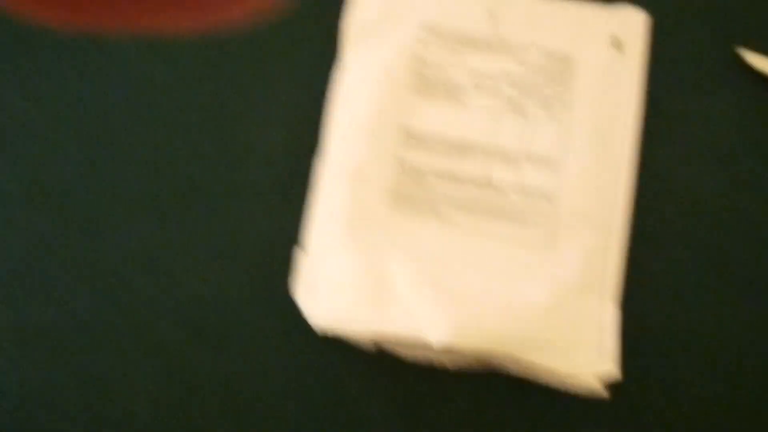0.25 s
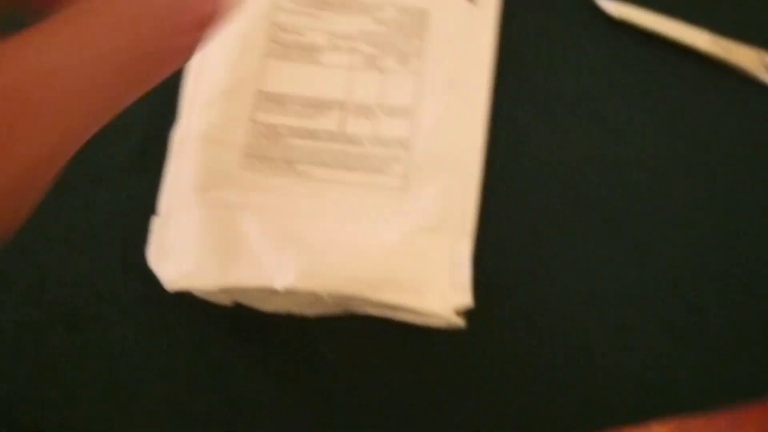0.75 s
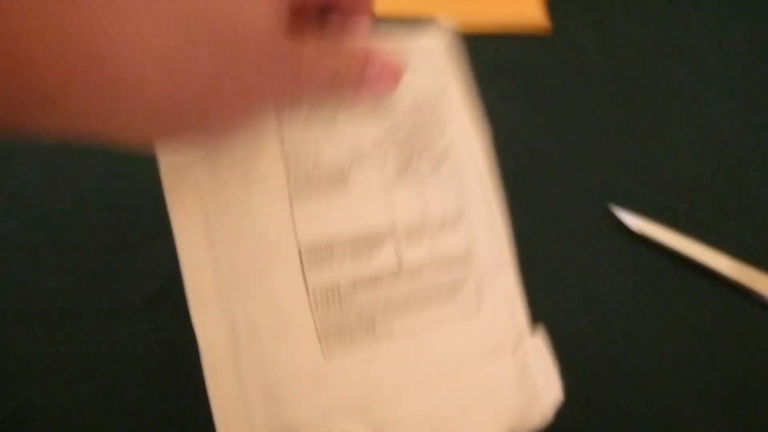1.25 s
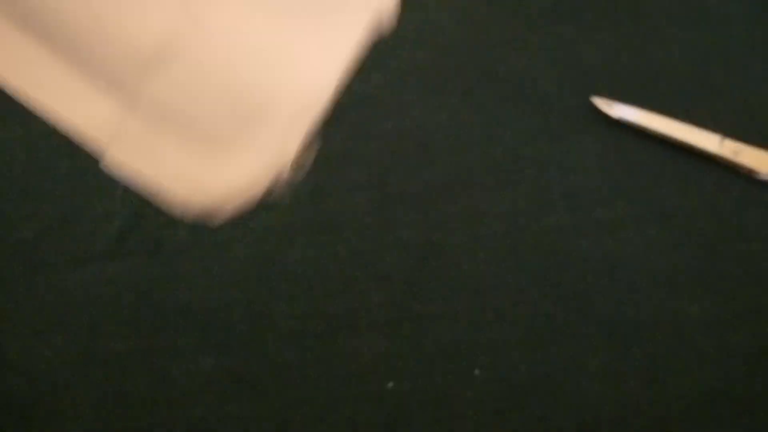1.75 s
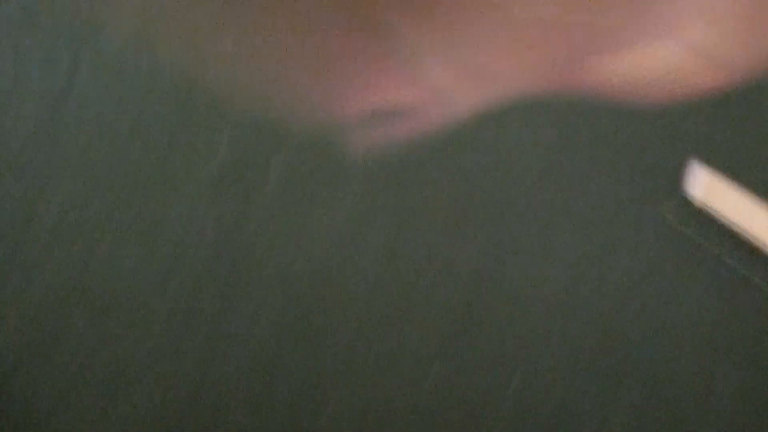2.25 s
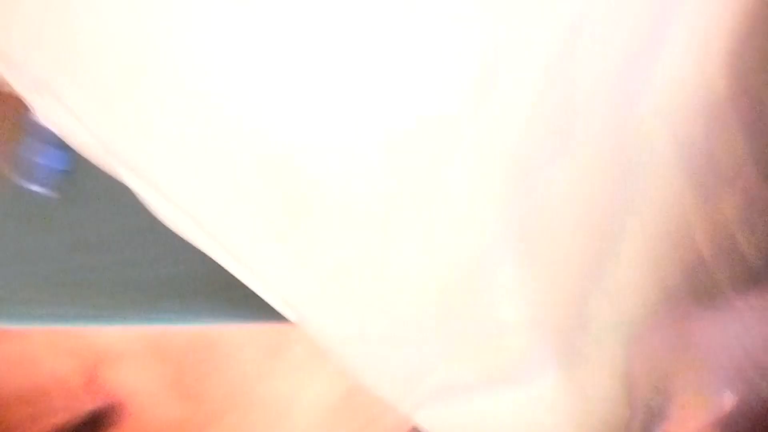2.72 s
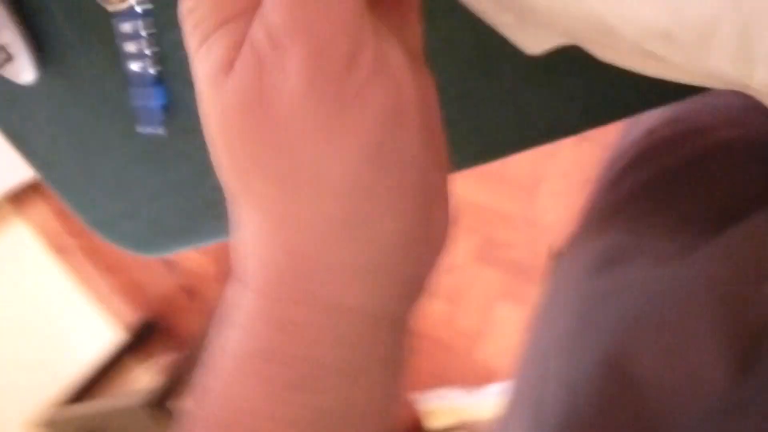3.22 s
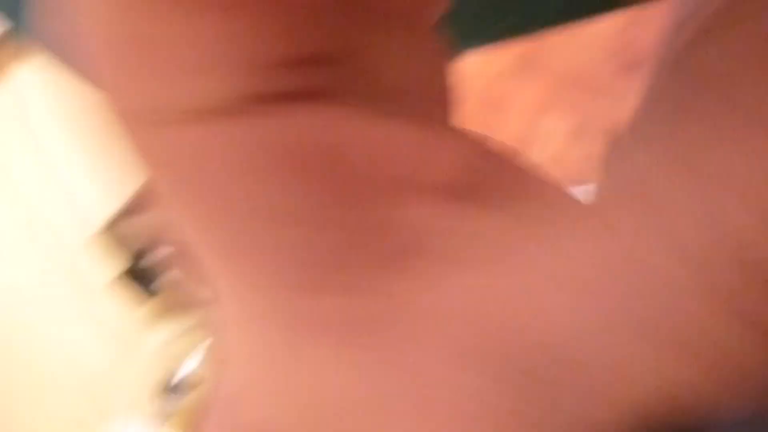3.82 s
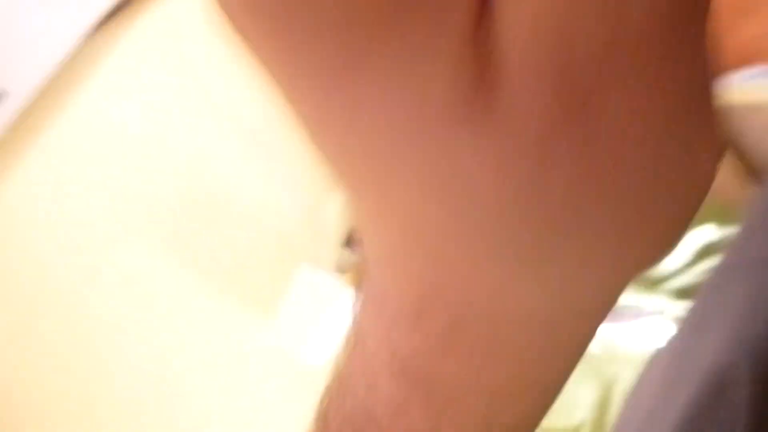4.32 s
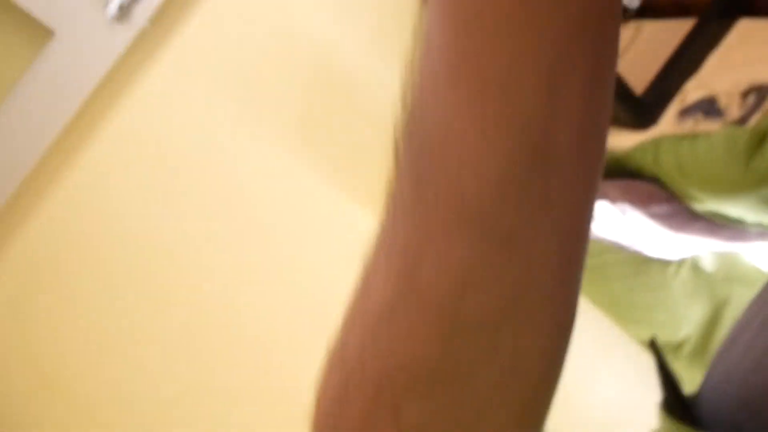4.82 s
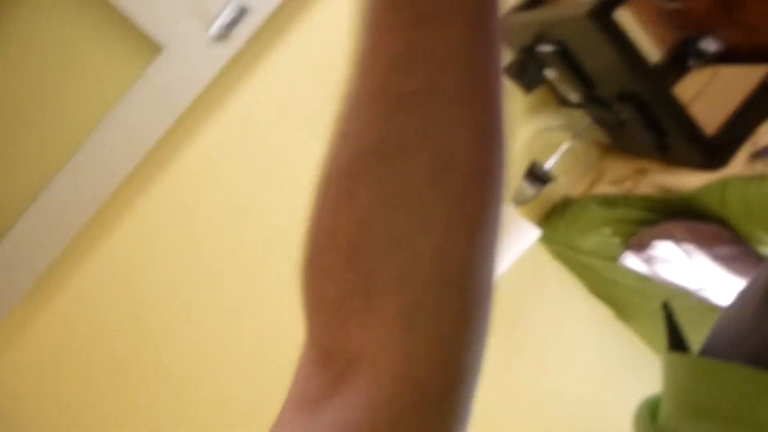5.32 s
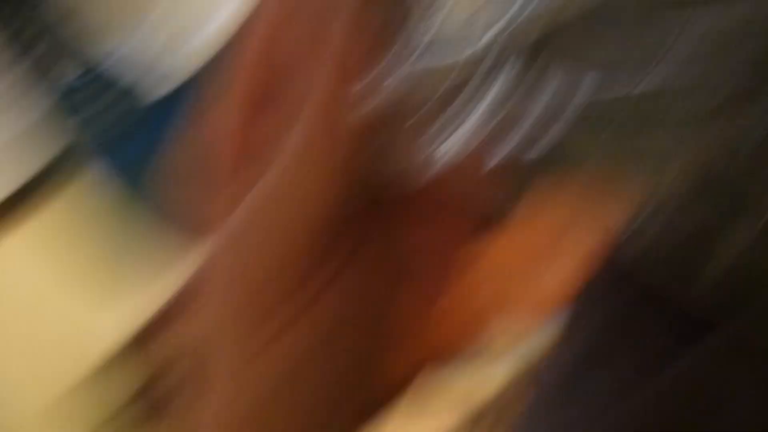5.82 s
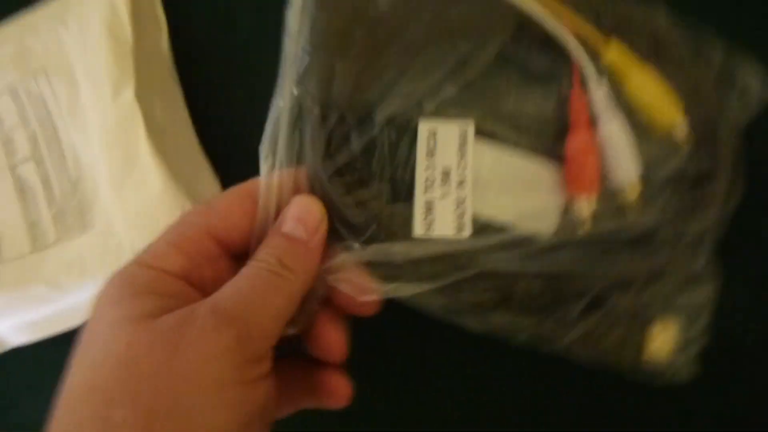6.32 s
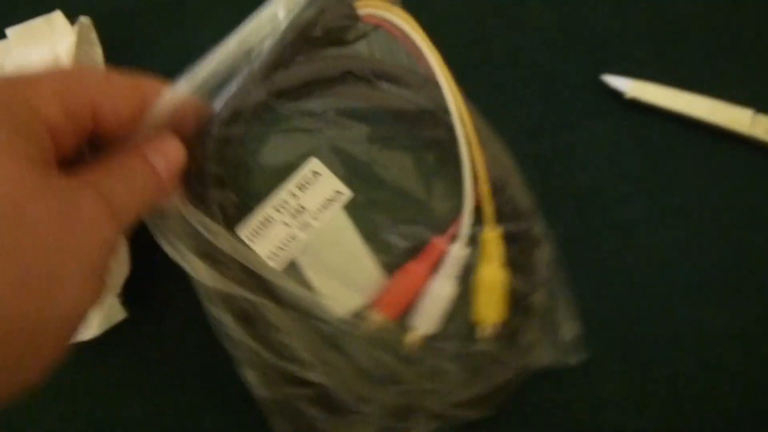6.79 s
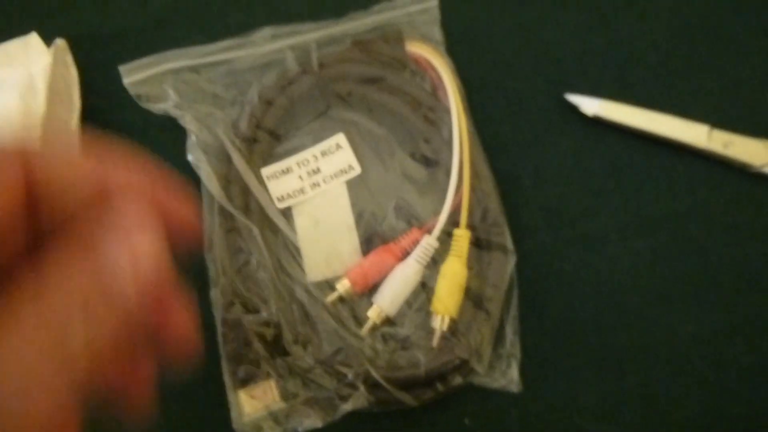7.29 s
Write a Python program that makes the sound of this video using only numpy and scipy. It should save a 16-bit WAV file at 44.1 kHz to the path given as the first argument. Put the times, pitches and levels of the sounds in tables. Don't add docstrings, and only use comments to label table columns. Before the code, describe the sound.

Very close to a small camera microphone in a quiet room, a stiff paper packet is brushed and lifted, then bursts into loud crackling. Hands open, rip and crumple it in uneven bursts, sharp snaps overloading at the peaks over dense tiny crackles and dull table knocks. Finally a plastic bag crinkles more lightly and is set down with a soft thud.

```python
import sys
import numpy as np
from scipy import signal
from scipy.fft import rfft, irfft, next_fast_len
from scipy.io import wavfile
from scipy.ndimage import uniform_filter1d

SR = 44100
rng = np.random.default_rng(int(sys.argv[2]) if len(sys.argv) > 2 else 0)


def linear_from_db(decibels):
    return 10 ** (np.asarray(decibels, float) / 20)


def unload_wav(signal):
    wavfile.write(
        sys.argv[1],
        SR,
        np.round(np.clip(np.atleast_2d(signal).T, -1, 1) * 32767).astype(np.int16),
    )


N = 332955

# (time [s], peak level [dB], panel pitch [Hz], crack above 5 kHz against the panel [dB])
LIFT_SNAPS = [(0.293, -21, 560, -15), (0.567, -24, 5360, 6.5), (1.095, -16, 2860, -20.5),
              (1.166, -8.5, 2630, -10), (1.277, -8, 1180, -25), (1.332, -9.5, 1310, -22),
              (1.347, -5.5, 1640, -9.5), (1.41, -7.5, 1770, -8.5), (1.439, -6, 1550, -23.5),
              (1.465, -18, 1290, -18), (1.553, 1.5, 1310, -11), (1.558, -12, 3080, -10),
              (1.619, -9, 2910, -1.5), (1.646, -7.5, 1160, -14), (1.675, -7, 1140, -6),
              (1.683, -2, 1770, -3.5), (1.693, -7.5, 950, -3), (1.76, -8.5, 1340, 0),
              (1.806, -20.5, 5300, -13), (1.973, -14.5, 1250, -24), (2.078, -33.5, 2110, -18)]
OPEN_SNAPS = [(2.3, -8.5, 3920, -3.5), (2.348, -13, 1530, -5), (2.458, -20, 620, -3),
              (2.612, -19.5, 4010, -7), (2.696, -29, 8350, 5.5), (2.814, -25.5, 3100, 1),
              (3.095, -15, 2520, 3), (3.195, -11, 4820, 5.5), (3.266, -5, 4610, -7.5),
              (3.27, -1.5, 2000, -5), (3.31, -7, 1230, -4), (3.501, -8, 4010, -1.5),
              (3.525, -11.5, 5150, -7.5), (3.602, -21.5, 2930, -15), (3.659, -15.5, 1120, -23),
              (3.683, -11.5, 2500, -22), (3.854, -11.5, 1180, -12), (3.895, -13.5, 3940, -7),
              (3.922, -10, 1400, -15), (3.955, -10.5, 2520, -10), (4.024, -20.5, 1640, -4)]
RIP_SNAPS = [(4.11, -6.5, 3120, -10), (4.113, -6.5, 1680, -11.5), (4.238, -6.5, 580, -18),
             (4.246, -8.5, 7240, -4), (4.255, -7.5, 3980, 2), (4.335, -9, 820, -9), (4.393, -7.5, 860, -22),
             (4.4, -7.5, 1550, -15), (4.457, -6, 900, 7.5), (4.498, 1, 4070, -3.5), (4.591, -20, 2300, -26),
             (4.672, -13.5, 1400, -2.5), (4.822, -8, 4110, 2), (5.028, -23.5, 2540, -11.5),
             (5.08, -3, 1770, -22), (5.082, 0, 3980, -23), (5.085, -4, 4820, -14), (5.136, -3.5, 1660, -12),
             (5.193, -9, 1870, -8.5), (5.206, -7, 1680, -22), (5.386, -15.5, 8100, 8.5),
             (5.398, -13, 5340, 0)]
BAG_SNAPS = [(5.531, -17.5, 1980, 2), (5.611, -13, 1380, -49), (5.698, -26, 3940, -16),
             (5.919, -10, 1590, -6), (5.904, -13.5, 5020, 8), (5.99, -15.5, 4870, 0.5),
             (6.019, -14, 6240, -1), (6.024, -19, 620, 3), (6.162, -22.5, 990, 6.5),
             (6.345, -17.5, 6630, 1), (6.383, -8.5, 1160, -9), (6.43, -17.5, 2970, 1.5),
             (6.745, -23, 2070, -21.5), (6.909, -23, 2260, -8), (6.952, -19, 5040, -7),
             (7.092, -12, 990, -6), (7.096, -13, 530, -15)]
# (time [s], peak level [dB])
TICKS = [(1.321, -17), (2.659, -31), (3.153, -19), (3.405, -16.5), (3.484, -20), (4.512, -11), (4.708, -18),
         (4.737, -15), (4.751, -21), (5.814, -11.5), (5.945, -19), (5.974, -23), (6.047, -21), (6.25, -23),
         (6.474, -19), (6.517, -24), (6.558, -21), (6.564, -22), (6.598, -18.5), (6.804, -22.5),
         (6.988, -18), (7.015, -24), (7.153, -29)]
TICK_HZ, TICK_CRACK_DB = 4700, 1.5
ALIKE_SNAPS = [(s, db, TICK_HZ, TICK_CRACK_DB) for s, db in TICKS]
SNAPS = LIFT_SNAPS + OPEN_SNAPS + RIP_SNAPS + BAG_SNAPS + ALIKE_SNAPS
# (time [s], peak level [dB], panel
# pitch [Hz])
LIFT_FOLDS = [(0.217, -29, 5470), (0.293, -22, 670), (0.533, -34, 1080), (1.066, -19, 2540),
              (1.096, -18, 2050), (1.135, -17, 2090), (1.167, -10, 2500), (1.35, -11, 1210),
              (1.382, -19, 4180), (1.41, -8, 1770), (1.425, -18, 1720), (1.439, -9, 2610),
              (1.456, -23, 3620), (1.559, -12, 1160), (1.637, -8, 990), (1.65, -13, 4800),
              (1.674, -6, 4110), (1.691, -2, 2780), (1.761, -9, 4760), (1.764, -14, 860),
              (1.806, -23, 1160), (1.818, -20, 1360), (1.848, -26, 1870), (1.891, -20, 800),
              (1.991, -24, 820), (2.043, -36, 5730), (2.348, -12, 2520), (2.457, -14, 4950),
              (2.535, -26, 3750), (2.568, -23, 2520), (2.629, -32, 2390), (2.658, -40, 1940)]
OPEN_FOLDS = [(2.803, -33, 1310), (2.815, -34, 1400), (2.841, -30, 4030), (2.861, -23, 1270),
              (2.897, -32, 9260), (2.945, -26, 2520), (3.054, -26, 2540), (3.073, -17, 4630),
              (3.172, -29, 1250), (3.18, -22, 7240), (3.195, -17, 930), (3.2, -6, 3940), (3.212, -19, 950),
              (3.31, -2, 4570), (3.332, -20, 6050), (3.376, -18, 8510), (3.471, -21, 3320),
              (3.486, -26, 1870), (3.498, -12, 4870), (3.503, -17, 1400), (3.635, -22, 5510),
              (3.639, -18, 1180), (3.666, -18, 670), (3.68, -21, 1440), (3.69, -15, 2610),
              (3.696, -15, 2650), (3.703, -22, 730), (3.736, -28, 4030), (3.739, -27, 1160),
              (3.743, -28, 1120), (3.784, -28, 3920), (3.791, -31, 7750), (3.809, -27, 670),
              (3.823, -19, 5990), (3.854, -11, 4130), (3.894, -19, 2480), (3.979, -26, 4010),
              (3.998, -24, 4010), (4.012, -25, 2930), (4.033, -23, 3900), (4.067, -26, 3750),
              (4.092, -26, 860)]
RIP_FOLDS = [(4.113, -8, 3290), (4.125, -12, 5790), (4.147, -10, 6850), (4.161, -9, 6460),
             (4.177, -11, 3880), (4.189, -10, 3640), (4.255, -10, 1770), (4.262, -12, 3470),
             (4.292, -15, 2800), (4.295, -15, 5490), (4.309, -19, 4030), (4.341, -13, 4050),
             (4.359, -15, 1810), (4.368, -13, 2650), (4.386, -12, 6010), (4.397, -7, 5640),
             (4.418, -14, 5530), (4.499, -9, 1640), (4.591, -22, 2520), (4.66, -25, 5100),
             (4.69, -22, 5080), (4.694, -21, 5170), (4.726, -21, 3940), (4.9, -29, 1180),
             (4.918, -29, 3920), (4.944, -32, 1660), (4.953, -34, 3270), (5.005, -32, 1660),
             (5.048, -25, 1100), (5.086, -8, 1660), (5.136, -5, 5060), (5.361, -11, 5210),
             (5.467, -31, 3600), (5.526, -21, 1140), (5.531, -15, 3140), (5.792, -27, 710),
             (5.799, -10, 6220), (5.842, -10, 4930), (5.847, -12, 5710), (5.879, -11, 5040)]
BAG_FOLDS = [(5.918, -9, 4160), (5.939, -21, 2800), (5.95, -19, 5560), (5.975, -33, 2500),
             (6.024, -13, 3960), (6.054, -26, 4070), (6.113, -26, 4090), (6.203, -26, 4130),
             (6.208, -26, 6800), (6.246, -30, 5020), (6.259, -30, 3920), (6.313, -29, 4740),
             (6.318, -31, 1060), (6.329, -28, 5000), (6.353, -23, 4090), (6.377, -17, 5120),
             (6.381, -16, 2690), (6.413, -21, 4630), (6.514, -28, 4310), (6.559, -32, 1510),
             (6.584, -16, 2520), (6.604, -24, 6370), (6.624, -22, 2560), (6.659, -27, 3920),
             (6.668, -34, 990), (6.681, -36, 1100), (6.75, -27, 5510), (6.77, -32, 5660),
             (6.804, -29, 1720), (6.849, -35, 1310), (6.936, -32, 7340), (6.953, -25, 1490),
             (6.99, -23, 1360), (7.015, -16, 4010), (7.022, -25, 4110), (7.047, -25, 5900),
             (7.072, -19, 4220), (7.095, -14, 2540), (7.151, -29, 6160), (7.215, -37, 2520)]
# (time [s], peak level [dB], pitch [Hz], time for the shaken sheet to lose 20 dB [s])
KNOCKS = [(0.289, -27, 189, .015), (0.528, -36, 300, .04), (0.563, -34, 260, .015),
          (1.0625, -17.5, 159, .25), (1.172, -20, 182, .17), (1.68, -25.5, 398, .08),
          (1.965, -32, 191, .05), (2.297, -26.5, 183, .05), (2.454, -15, 330, .012),
          (2.563, -30.5, 108, .012), (4.225, -12, 343, .05), (4.492, -23.5, 170.5, .012),
          (4.817, -27, 188, .12), (6.017, -25, 351, .035), (6.375, -13.5, 187.5, .075),
          (7.09, -15, 270, .11)]
# (time [s], level [dB])
SLIDE = [
    (.155, -72),
    (.168, -40),
    (.205, -42),
    (.218, -53),
]
# (pitch [Hz], width [Hz], level [dB])
SLIDE_TONES = [(8250, 1900, 4.5), (10700, 1500, 1.5), (5000, 2200, -6)]
# (time [s], peak level [dB], pitch [Hz], time to lose 20 dB [cycles], swell [cycles])
RINGS = [
    (.317, -18, 4600, 4, 0.65),
    (0.319, -17.5, 7950, 6, 0.45),
    (.322, -29.5, 1273, 55, 16),
    (.32, -42, 2120, 60, 20),
    (7.12, -53, 205, 90, 6),
    (2.13, -66, 2700, 900, 350),
]
# (start [s], end [s], first pitch [Hz], last pitch [Hz], width [Hz], level [dB])
SCRAPES = [
    (2.935, 3.108, 2050, 2450, 650, -41),
    (6.19, 6.5, 760, 1500, 310, -49.5),
    (2.495, 2.565, 720, 200, 120, -46),
]
# (lowest pitch [Hz], highest pitch [Hz], ring [cycles], rate [per s],
# size spread [dB], share led by crumple rather than fizz [0-1], level [dB])
GRAINS = [
    (646, 1800, 1.72, 700, 4.5, 1, -5),
    (1830, 3820, 1.4, 1300, 3, 0.65, -3.5),
    (4000, 7670, 1.6, 2200, 3.5, 0.12, -1.5),
    (7870, 13800, 2.2, 3500, 4, 0, -4.5),
]
# (peak time [s], effort [dB], brightness [dB], time to swell 20 dB [s], time to fade 20 dB [s])
LIFT_GRIPS = [(0.0, -57, -4, .01, .3), (.33, -41.5, -8, .14, .2), (.41, -52, 1.5, .15, .08),
              (.555, -46, -4, .1, .045), (.8, -63, -7, 1.5, 1.5), (1.07, -27.5, -4, .012, .07),
              (1.165, -26, -7, .18, .13), (1.28, -23.5, -8, .03, .045), (1.342, -22.5, -10, .055, .06),
              (1.41, -32.5, -6, .3, .17), (1.558, -31, -4, .07, .2), (1.639, -21.5, -5, .17, .05),
              (1.684, -20.5, -3.5, .04, .07), (1.77, -32, -7, .12, .2), (1.98, -36.5, -10, .45, .1)]
OPEN_GRIPS = [(2.308, -28, 0, .017, .14), (2.4, -32.5, 8, .2, .12), (2.462, -33, -3, .1, .06),
              (2.545, -43, 0, .6, .065), (2.85, -46.5, -3, .22, .2), (2.996, -37.5, -4, .16, .45),
              (3.148, -32.5, -5, .45, .055), (3.205, -28.5, -3, .035, .2), (3.27, -34, 2.5, .2, .3),
              (3.375, -37.5, 0, .45, .45), (3.533, -27.5, -2.5, .11, .085), (3.638, -26, -11, .008, .14),
              (3.7, -37, -6, .1, .2), (3.832, -29, -2.5, .015, .22)]
RIP_GRIPS = [(4.112, -29, -5, .07, .3), (4.225, -24, -1.5, .4, .115), (4.396, -27.5, -1.5, .13, .12),
             (4.504, -34, 0, .45, .075), (4.58, -47, -2.5, .3, .25), (4.679, -35.5, -4, .035, .2),
             (4.74, -41, 1.5, .1, .07), (4.818, -28, 1.5, .05, .105), (5.012, -46, 0, .012, .4),
             (5.081, -25.5, -13, .03, .09), (5.2, -25, 1.5, .14, .65), (5.389, -34.5, 0, .45, .11),
             (5.528, -28.5, -19, .025, .085), (5.615, -37, -16, .025, .17), (5.811, -27.5, 3, .03, .2),
             (5.913, -25.5, -5, .1, .048)]
BAG_GRIPS = [(6.025, -41, -6, .12, .1), (6.13, -53, 11, .2, .2), (6.208, -46, -1.5, .18, .03),
             (6.255, -41, -6, .018, .055), (6.36, -44, -4, .25, .1), (6.384, -34.5, -2.5, .03, .13),
             (6.57, -47, 0, .8, .6), (6.995, -44, -2.5, .17, .3), (7.096, -32.5, -3.5, .15, .11)]
FIZZ_STEEPER = 1.1
FLAPS_DB = [
    -18,
    -10.5,
    -10.5,
    -17,
]
SHAKE_DB, SHAKE_RISE_S, SHAKE_LATE_S = -14.5, .012, .016
# (time [s], left over right [dB])
PLACE = [(0.0, -2.5), (2.42, 2.5), (3.39, -6.5), (6.37, -1.5), (6.69, -0.5), (7.55, 1.5)]
# (frequency [Hz], time to die by 60 dB [s])
ROOM = [(100, 0.24), (500, 0.28), (2000, 0.067), (8000, 0.09), (16000, 0.047)]
# (pitch [Hz], width [Hz], level [dB])
CASE = [(4070, 120, -8.5), (4840, 180, -8.5)]
# (frequency [Hz], side over mid [dB])
WIDEN = [(60, -18), (130, -12), (290, 6), (600, 1.5), (1200, -9.5), (4000, -15), (15000, -10)]
# (frequency [Hz], level per Hz [dB])
STILL = [(40, -10), (110, -5.5), (240, 6), (400, -2.5), (800, -2.5), (1600, -10.5), (4000, -17.5),
         (15000, -21)]
# (frequency [Hz], side over mid [dB])
STILL_SIDE = [(60, -15), (130, 0), (640, 8.5), (1410, 4), (3100, 3), (15000, -10)]
STILL_DB = -60.5


def evened(x):
    return x / np.sqrt(np.mean(x ** 2) + 1e-20)


def smooth(x, first, second):
    return uniform_filter1d(uniform_filter1d(x, first), second)


def read(points, hz):
    f, value = np.transpose(points)
    return np.interp(np.log(hz + 1), np.log(f + 1), value)


def curve(rows, column):
    s, value = np.transpose(rows)[[0, column]]
    return np.interp(np.arange(N) / SR, s, value, -120, -120)


def add(mix, s, sound):
    part = mix[:, round(s * SR):][:, :sound.shape[1]]
    part += sound[:, :part.shape[1]]


def place(s):
    pan_db = np.interp(s, *np.transpose(PLACE))
    return linear_from_db(np.array([pan_db / 2, -pan_db / 2]))


def resonate(x, hz, width):
    return signal.lfilter(*signal.iirpeak(hz, hz / width, SR), x)


def burst(t, peak_s):
    return t / peak_s * np.exp(1 - t / peak_s)


def ping(hz, cycles, phase, size, rise=0.61):
    u = np.arange(size) * hz / SR
    swell = np.sin(np.pi / 2 * np.minimum(u / rise, 1)) ** 2
    return np.sin(2 * np.pi * u + phase) * swell * linear_from_db(-20 * u / cycles)


def air():
    frames, hz = N // 256 + 5, np.fft.rfftfreq(512, 1 / SR)
    a, b, c, d, patches = rng.standard_normal((frames, 257, 5)).T
    patches = evened(uniform_filter1d(uniform_filter1d(patches, 5, 0), 12, 1))
    z = np.array([a + 1j * b, (c + 1j * d) * linear_from_db(read(STILL_SIDE, hz))[:, None]])
    colour = linear_from_db(read(STILL, hz)[:, None] + 0.76 * patches)
    mid, side = signal.istft(z * colour, nperseg=512, noverlap=256)[1][:, :N]
    return linear_from_db(STILL_DB) * np.array([mid + side, mid - side]) / np.std(mid)


def swells(rows, steeper=1):
    t = np.arange(0, N + 32, 32) / SR
    s, db, rise, fade = np.transpose(rows)[:, :, None]
    away = np.maximum((s - t) / rise, (t - s) / fade)
    alive = (t >= np.r_[[[-1]], s[:-1]]) & (t <= np.r_[s[1:], [[N]]])
    level = np.where(alive, db - 20 * steeper * away, -200).max(0)
    return np.interp(np.arange(N) / SR, t, level)


def hands():
    actions = (LIFT_GRIPS, OPEN_GRIPS, RIP_GRIPS, BAG_GRIPS)
    grips = [(*grip, flap) for action, flap in zip(actions, FLAPS_DB) for grip in action]
    crumple_db = swells([(s, db, rise, fade) for s, db, _, rise, fade, _ in grips])
    fizz_db = swells([(s, db + bright, rise, fade) for s, db, bright, rise, fade, _ in grips], FIZZ_STEEPER)
    sway_db = swells([(s, db + flap, rise, fade) for s, db, _, rise, fade, flap in grips])
    shake_db = swells([(s + SHAKE_LATE_S, db + SHAKE_DB, SHAKE_RISE_S, fade) for s, db, _, fade in KNOCKS])
    return np.maximum(sway_db, shake_db), crumple_db, fizz_db


def clicks(rate, spread_db):
    size = linear_from_db(spread_db * np.minimum(rng.exponential(1, N), 3.6))
    struck = rng.random(N) < rate / SR
    return evened(size * struck * rng.choice([-1., 1.], N))


def grains(low_hz, high_hz, cycles, rate, spread_db, clumps, ticks, hiss=0.38, apart=0.16, count=7):
    drive = clicks(rate * clumps, spread_db) + hiss * rng.standard_normal(N)
    wander = evened(np.log(clumps))
    which, family = rng.integers(0, count, N), np.zeros((2, N))
    for k, hz in enumerate(np.geomspace(low_hz, high_hz, 2 * count + 1)[1::2]):
        pole = linear_from_db(-20 * hz / SR / cycles) * np.exp(2j * np.pi * hz / SR)
        push = drive * (which == k) + ticks * rng.choice([-1, 1])
        ring = signal.lfilter([(1 - abs(pole)) ** 1.98], [1, -2 * pole, pole ** 2], push)
        drift = rng.standard_normal() + 1.5 * np.roll(wander, 9000 * (k + 1))
        turn = apart * (0.28 + hz / 9000) * drift
        family += np.cos(turn) * ring.imag + np.sin(turn) * ring.real * [[1], [-1]]
    return evened(family * clumps)


def rustle(clump_db=1.4):
    flap_db, crumple_db, fizz_db = hands()
    clumps = linear_from_db(clump_db * evened(smooth(rng.standard_normal(N), 330, 140)))
    busy = np.clip((crumple_db + 61.5) / 15, 0, 1)
    ticks = 0.1 * busy * clicks(200 * clumps, 2.8)
    out = linear_from_db(flap_db - 1.0) * grains(88, 430, 1.66, 500, 2.5, clumps ** .5, 0, count=5)
    for *family, share, db in GRAINS:
        level_db = db + share * crumple_db + (1 - share) * fizz_db
        out += linear_from_db(level_db) * grains(*family, clumps, ticks)
    return out * place(np.arange(N) / SR)


def slide():
    noise = rng.standard_normal(N)
    hiss = .11 * noise
    for hz, width, db in SLIDE_TONES:
        hiss = hiss + linear_from_db(db) * resonate(resonate(noise, hz, width), hz, width)
    return evened(hiss) * linear_from_db(curve(SLIDE, column=1)) * place([.2])


def folds(cycles=1.8, crack_s=0.00025, crack_db=-6, bright_db=5):
    rows = LIFT_FOLDS + OPEN_FOLDS + RIP_FOLDS + BAG_FOLDS
    out, t = np.zeros((2, N)), np.arange(300) / SR
    chance = rng.standard_normal((len(rows), 602))
    edge = signal.butter(2, [2200, 12500], "band", fs=SR)
    for (s, db, hz), row in zip(rows, chance):
        panel = ping(hz, cycles * (hz / 1500) ** 0.7, 3 * row[0], 300)
        a, c = row[2:].reshape(2, -1)
        tick = evened(signal.lfilter(*edge, [a + .4 * c, a - .4 * c])) * burst(t, crack_s)
        tick_db = crack_db + bright_db * np.log2(hz / 4000)
        sound = panel / abs(panel).max() + linear_from_db(tick_db) * tick
        gains = place(s) * linear_from_db(1.5 * row[1] * np.array([1, -1]))
        add(out, s - .0003 - .6 / hz, linear_from_db(db - 0.3) * gains[:, None] * sound / abs(sound).max())
    return out


def knocks():
    out, t = np.zeros((2, N)), np.arange(9000) / SR
    phases = rng.uniform(0, 2 * np.pi, len(KNOCKS))
    noise = rng.standard_normal((len(KNOCKS), len(t)))
    for (s, db, hz, fade), phase, shake in zip(KNOCKS, phases, noise):
        push = ping(1.15 * hz, 1.33, phase, len(t))
        grumble = evened(resonate(resonate(shake, hz, 0.57 * hz), hz, 0.45 * hz))
        grumble *= linear_from_db(-60 * t / min(0.19, 3 * fade)) * (1 - np.exp(-t / 0.0036))
        add(out, s + 0.00297, linear_from_db(db - 2.5) * np.ones((2, 1)) * (3.26 * push + 0.3 * grumble))
    return out


def snaps(cycles=2.46, crack_s=0.00044, crack_db=-7, wide_db=-10.5):
    out, t = np.zeros((2, N)), np.arange(500) / SR
    chance, noise = rng.random((len(SNAPS), 4)), rng.standard_normal((len(SNAPS), 3, 500))
    body = signal.butter(2, [700, 5500], "band", fs=SR)
    for (s, db, hz, rel_db), (phase, pan, length, top), (a, b, c) in zip(SNAPS, chance, noise):
        long = cycles * (0.88 + 0.68 * length) * (hz / 1500) ** 0.9
        panel = ping(hz, long, 2 * np.pi * phase, 500)
        panel = signal.lfilter(*signal.butter(2, .42 * hz, "high", fs=SR), panel)
        rattle = evened(signal.lfilter(*body, b)) * burst(t, 0.0007)
        treble = signal.butter(2, [5000, 9000 + 5000 * top], "band", fs=SR)
        crack = evened(signal.lfilter(*treble, [a + 0.45 * c, a - .6 * c])) * burst(t, crack_s)
        sound = panel / abs(panel).max() + linear_from_db(wide_db) * rattle + linear_from_db(rel_db + crack_db) * crack
        gains = place(s) * linear_from_db(2.2 * (pan - .5) * np.array([1, -1]))
        add(out, s - .0003 - .6 / hz, linear_from_db(db - 1.42) * gains[:, None] * sound)
    return out


def rings():
    out = np.zeros((2, N))
    for s, db, hz, cycles, rise in RINGS:
        add(out, s, linear_from_db(db + 2.5) * place(s)[:, None] * ping(hz, cycles, 0, 19000, rise))
    return out


def scrapes(lump_db=4):
    out = np.zeros((2, N))
    for t0, t1, hz0, hz1, width, db in SCRAPES:
        size = round((t1 - t0) * SR)
        turn = np.exp(2j * np.pi * np.cumsum(np.linspace(hz0, hz1, size)) / SR)
        rub = signal.lfilter(*signal.butter(2, width / 2, fs=SR), rng.standard_normal((2, size)))
        hollow = evened((turn * (rub[0] + 1j * rub[1])).real) * signal.windows.tukey(size, .5)
        hollow = hollow * linear_from_db(lump_db * evened(smooth(rng.standard_normal(size), 300, 300)))
        add(out, t0, linear_from_db(db) * place(t0)[:, None] * hollow)
    return out


def room(x, size=11000):
    taps = np.zeros((2, size))
    at = np.arange(120, size - 20, 20)
    at = at + rng.integers(0, 20, (2, len(at)))
    np.put_along_axis(taps, at, rng.choice([-1., 1.], at.shape), 1)
    hz, t, z = signal.stft(taps, SR, nperseg=128)
    tail = signal.istft(z * linear_from_db(-60 * t / read(ROOM, hz)[:, None]), SR, nperseg=128)[1]
    return signal.oaconvolve(x.mean(0)[None], tail / np.linalg.norm(tail[0]), axes=1)[:, :N]


def ports(x, wet):
    size = next_fast_len(N)
    gain = linear_from_db(read(WIDEN, np.fft.rfftfreq(size, 1 / SR)))
    turned_mid = 1j * rfft(x.mean(0), size)
    room_side = rfft(wet[0] - wet[1], size)
    side = irfft(gain * (turned_mid + 0.73 * room_side), size)[:N]
    return x + wet + np.array([side, -side])


def scene():
    near = rustle() + slide() + folds() + knocks() + snaps() + rings() + scrapes()
    near = signal.lfilter(*signal.butter(2, 105, "high", fs=SR), near)
    wet = linear_from_db(-19) * room(near)
    return ports(near, wet) + air()


def roll_off(x):
    return signal.sosfilt(signal.butter(12, 16520, fs=SR, output="sos"), x)


def record(dry):
    x = dry + sum(linear_from_db(db) * resonate(dry, hz, width) for hz, width, db in CASE)
    x = signal.lfilter(*signal.butter(1, 45, "high", fs=SR), x)
    overloaded = np.clip(x, -1, 1)
    band_limit = signal.firwin(511, 15750, window=("kaiser", 8), fs=SR)
    mix = signal.oaconvolve(overloaded, band_limit[None], "same")
    return roll_off(mix)


dry = scene()
out = record(dry)
unload_wav(out)
```